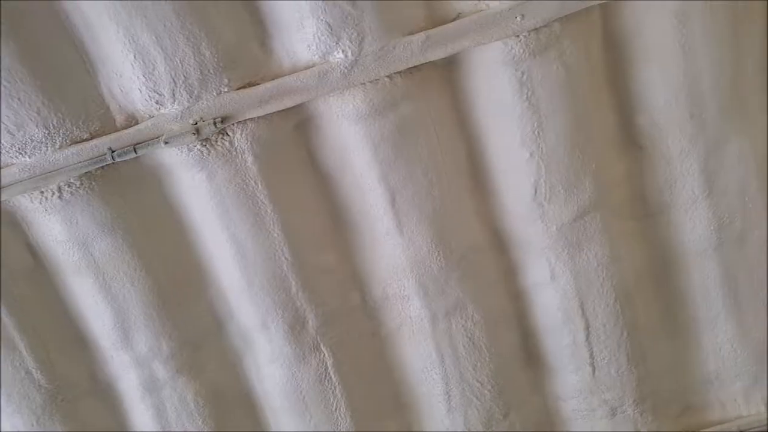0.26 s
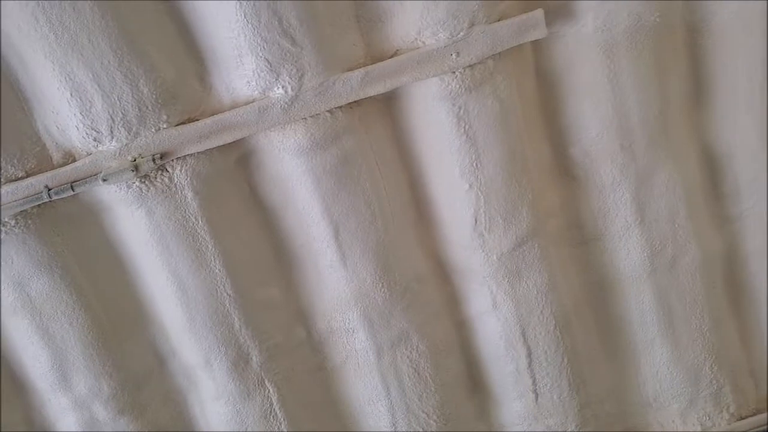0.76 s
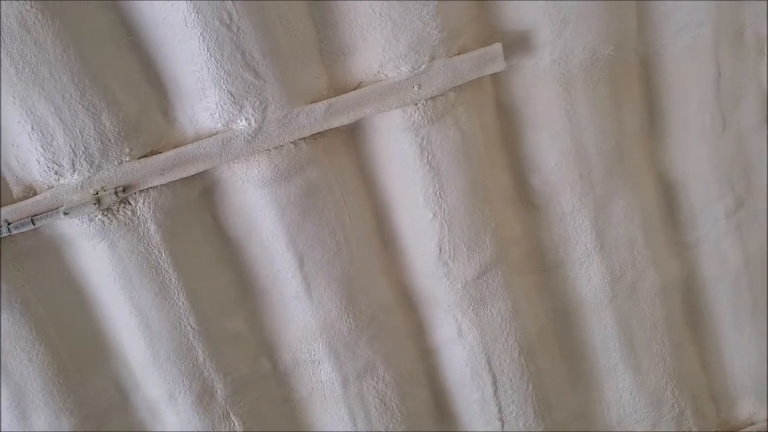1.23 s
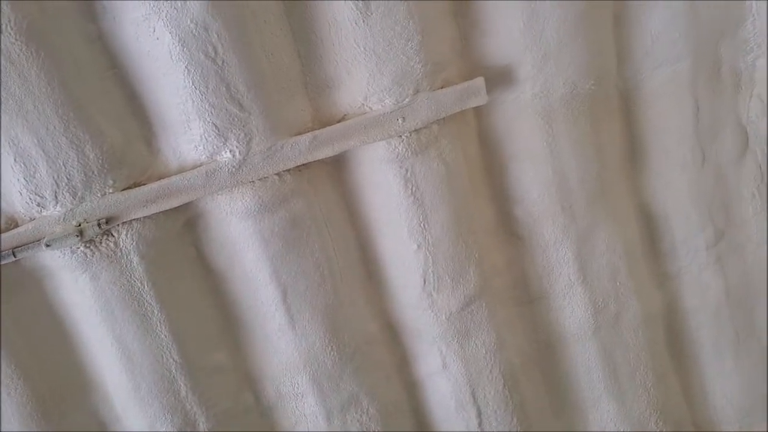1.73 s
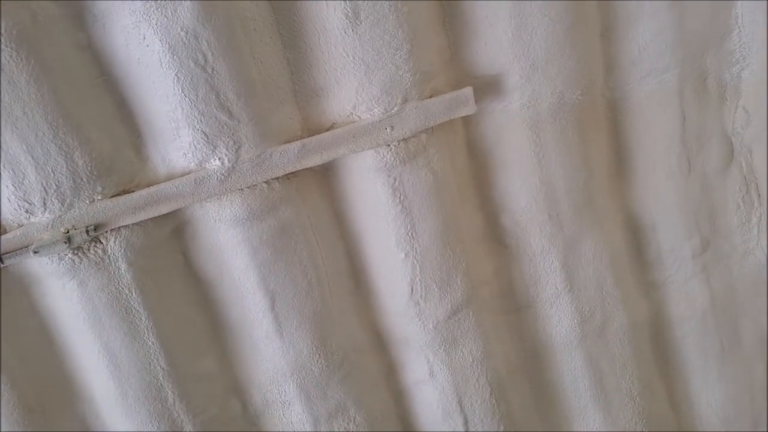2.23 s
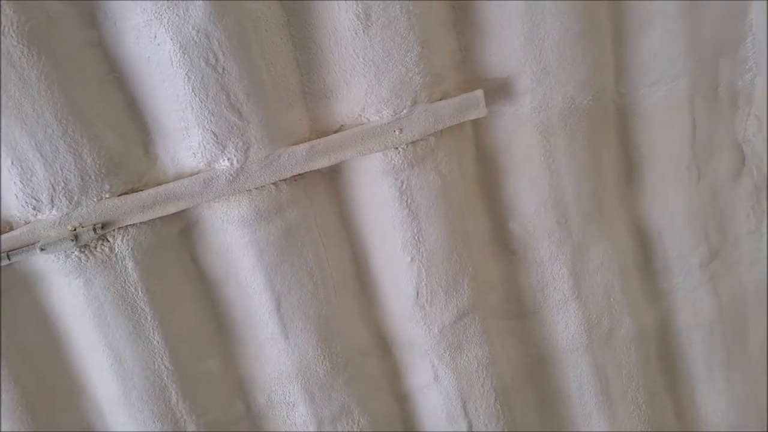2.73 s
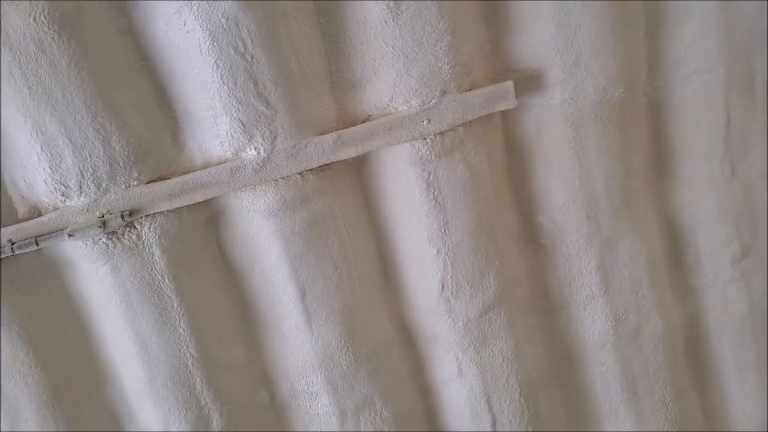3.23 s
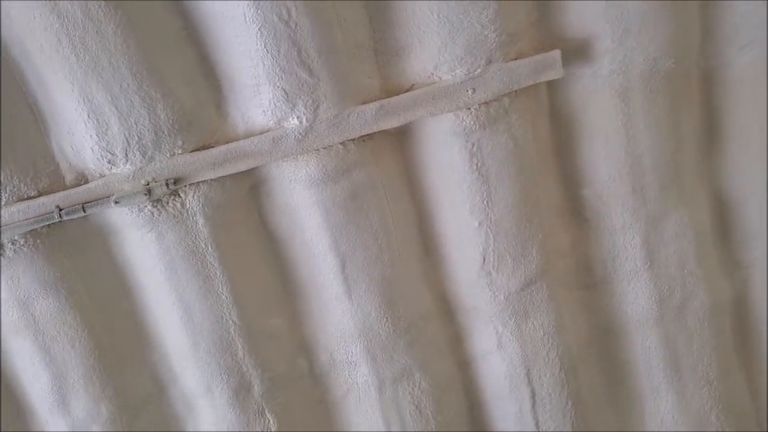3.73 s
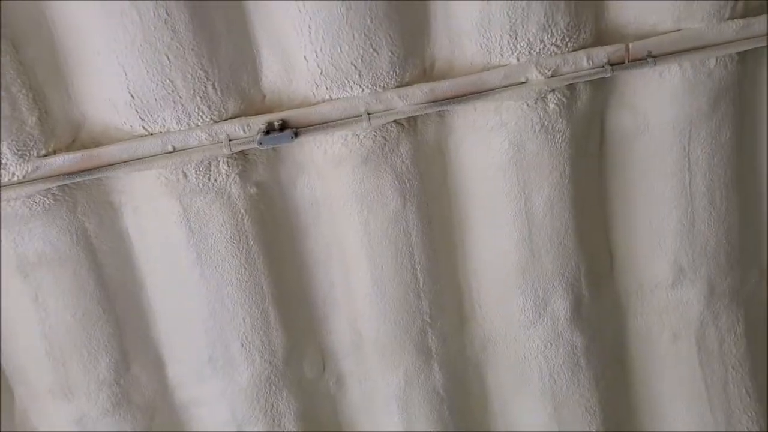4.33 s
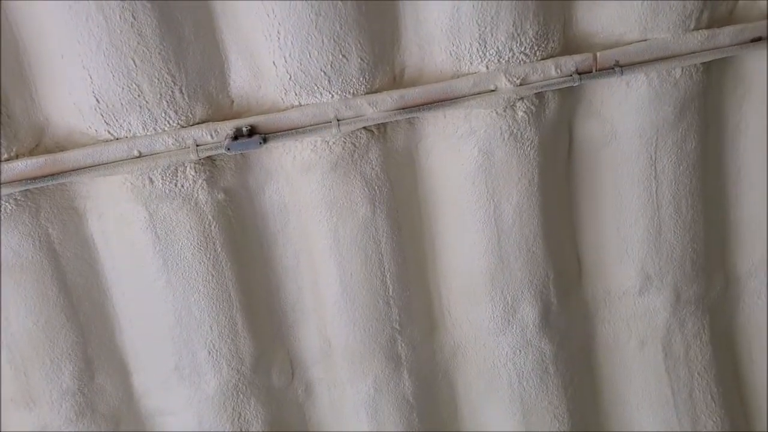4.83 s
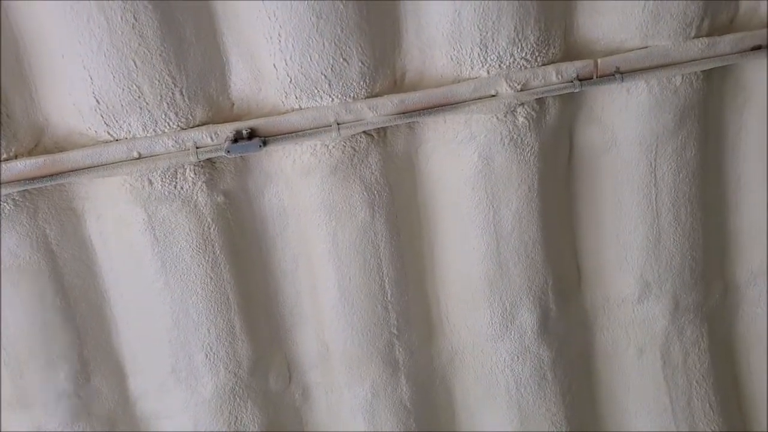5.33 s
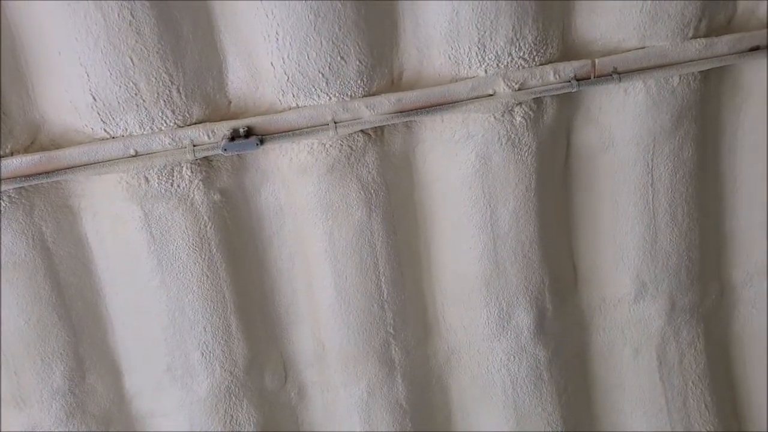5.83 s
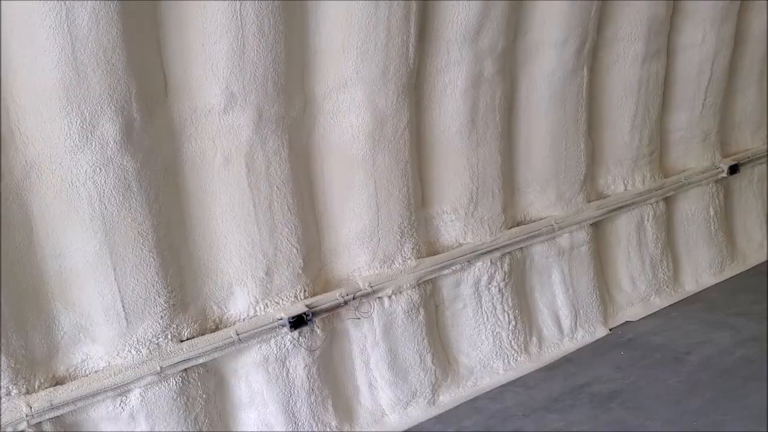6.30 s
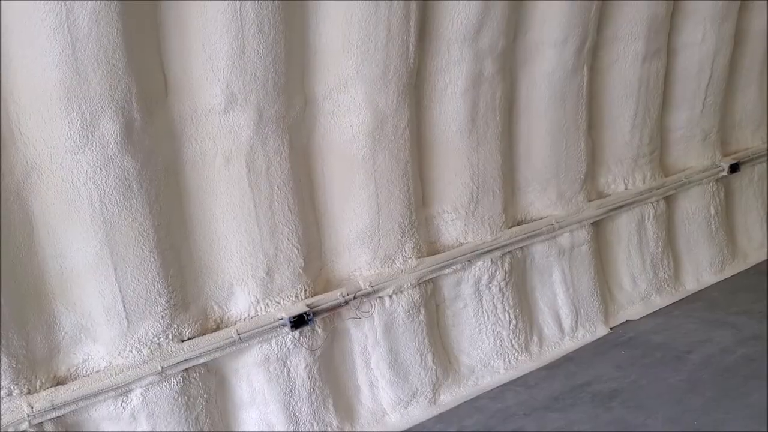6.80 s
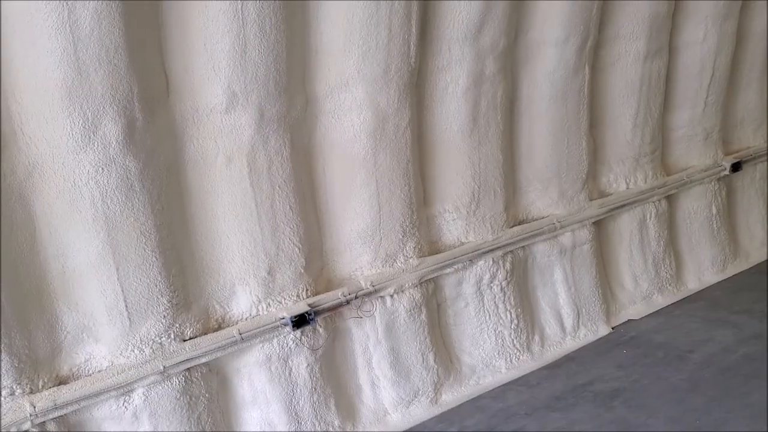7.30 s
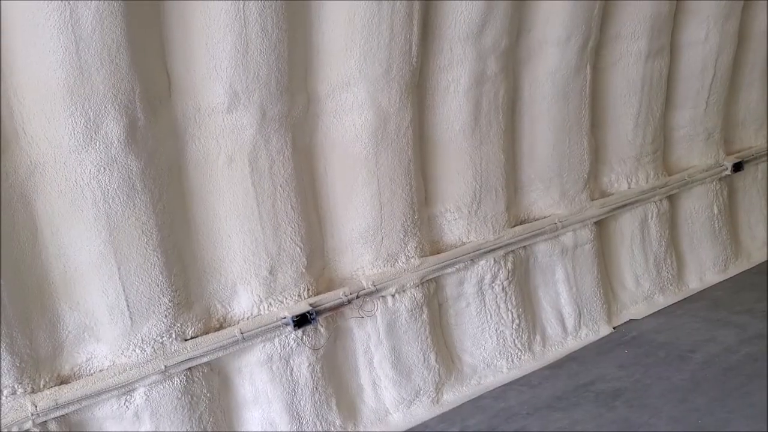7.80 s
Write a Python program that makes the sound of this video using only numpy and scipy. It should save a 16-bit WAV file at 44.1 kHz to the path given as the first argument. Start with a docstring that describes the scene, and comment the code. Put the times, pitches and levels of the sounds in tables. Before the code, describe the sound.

In a large, empty metal shed, stiff foam tears off the steel with six abrupt cracks: two moderate, then two louder and bassier, then two thinner and brighter after longer gaps. Each has a quick floor slap and a dense, fading echo. Underneath are soft hiss, a thin high insect buzz mostly on the left, and low thumps and rumble from a hand-held phone.

```python
"""Foam cracking off a steel roof

Hard foam lets go of a steel roof in a long vaulted shed: six sharp cracks of torn noise and clicks, each with
a floor bounce and dense reverberation made of decaying noise. Insects outside are a pulsed noise band.
The hand-held phone rumbles with filtered noise and takes bumps made of short tones. Under it all lie hiss
and faint low sines. The phone's two microphones differ in colour."""
import sys
import numpy as np
from scipy import signal
from scipy.fft import rfft, irfft, next_fast_len
from scipy.io import wavfile
from scipy.ndimage import uniform_filter1d, map_coordinates

SR = 44100
rng = np.random.default_rng(int(sys.argv[2]) if len(sys.argv) > 2 else 0)


def waveform_to_disk(signal):
    """Save audio, clipped to [-1, 1], as 16-bit WAV at the path in sys.argv[1]."""
    frames = np.transpose(np.atleast_2d(signal))
    scaled = np.clip(frames, -1, 1) * 32767
    samples = np.round(scaled).astype(np.int16)
    wavfile.write(sys.argv[1], SR, samples)


N = 355225


def amp(db):
    """Amplitude ratio of a level in dB."""
    return 10 ** (np.asarray(db) / 20)


def unit(x):
    """x scaled to unit RMS in each channel."""
    return x / np.sqrt(np.mean(x ** 2, axis=-1, keepdims=True) + 1e-20)


def along(points, hz):
    """(f/Hz, value) points interpolated on a log-frequency axis."""
    f, v = np.transpose(points)
    return np.interp(np.log(hz + 1), np.log(f + 1), v)


def bell(hz, centre_hz, width_hz, db):
    """A resonance peak or dip in dB; width at half its dB height."""
    return db / (1 + (2 * (hz - centre_hz) / width_hz) ** 2)


def curves(rows):
    """One value per sample for each column after the time."""
    s, *cols = np.transpose(rows)
    return np.array([np.interp(np.arange(N) / SR, s, c) for c in cols])


def wobble(knots_per_s):
    """A smooth random curve through normally distributed knots."""
    knots = rng.standard_normal(int(N * knots_per_s / SR) + 4)
    return map_coordinates(knots, [np.arange(N) * knots_per_s / SR])


def filtered(x, response):
    """x times a response of frequency."""
    n = x.shape[-1]
    m = next_fast_len(n + 8192)
    return irfft(rfft(x, m) * response(np.fft.rfftfreq(m, 1 / SR)), m)[..., :n]


def causal(gain_db):
    """The minimum-phase response with this gain, through the folded cepstrum."""
    c = irfft(gain_db * np.log(10) / 20)
    half = c.shape[-1] // 2
    c[..., 1:half] *= 2
    c[..., half + 1:] = 0
    return np.exp(rfft(c))


def cracks():
    """Foam tears off the sheet: direct sound and shed reverberation, both coloured by roof and microphones."""
    # cracks: t/s, strength/dB, bass/dB, treble/dB, snap/dB, bounce delay/ms, bounce/dB, lead-in/ms,
    # bass decay factor, knock of the sheet f/Hz, loosened panel f/Hz, panel/dB, boom/dB, rib mode/dB
    crack_rows = [(0.834, -29.5, -3, -3.5, -2.5, 6.4, -6.5, 1.9, 0.92, 1800, 1500, 1.5, 1.5, 2.5),
                  (1.725, -31, -2.5, -1.7, -1.5, 6.4, -1, 0.7, 0.95, 1750, 260, 3.5, -0.5, 6),
                  (1.965, -18.5, 8, -6, -1.5, 5.9, -0.5, 3.3, 1.195, 1411, 2500, 4, -3, 6),
                  (2.554, -13.5, 2, -8, -2.5, 4.9, -5.5, 0.98, 1.25, 442, 2454, 0.5, 1.5, -5.5),
                  (4.3507, -20, -14.5, 2, 1.5, 8.1, 0.5, 0.83, 0.98, 1660, 860, 10, 4.5, -10),
                  (6.7968, -23.5, -13, -2.05, 1.8, 6.6, 2, 0.72, 0.9, 1800, 750, 9.5, 3.5, -3.5)]
    n, start = 2 * SR, SR // 50
    t = (np.arange(n) - start) / SR
    out = np.zeros((2, N + n))
    for (s, strength_db, bass_db, treble_db, snap_db, delay_ms, bounce_db, lead_in_ms, bass_factor,
         knock_hz, panel_hz, panel_db, boom_db, rib_db) in crack_rows:
        burst, lead_in = tearing(t, start, lead_in_ms)
        bounce = floor_bounce(burst, delay_ms, bounce_db)
        near = direct_sound(amp(snap_db) * (burst + lead_in) + bounce, knock_hz)
        late = shed_filling(t, start, delay_ms, bass_factor)
        sound = roof_colour(amp(strength_db) * (near + late), bass_db, treble_db, knock_hz,
                            panel_hz, panel_db, boom_db, rib_db)
        out[:, round(s * SR) - start:][:, :n] += sound
    return out[:, :N]


def tearing(t, start, lead_in_ms):
    """The split: faint noise swelling just before the clicks, then clicks and a few ms of tearing noise."""
    tear = rng.standard_normal((2, len(t)))
    tear[1] = 0.47 * tear[0] + 0.19 * tear[1]
    burst = 0.75 * tear * (t > 0) * amp(-60 * np.maximum(t, 0) / 0.016)
    burst[:, start] = 0.59
    burst[:, start + 14] += 2.1  # the main click, 14 samples after the first
    burst[:, start + rng.integers(20, 90)] += 0.8  # a weaker third click at a random short delay
    lead_in = 0.17 * tear * (t < 0) * np.exp(np.minimum(t, 0) * 1000 / lead_in_ms)
    return burst, lead_in


def floor_bounce(burst, delay_ms, bounce_db):
    """The floor returns the burst after a delay, stronger on the right."""
    lag = round(delay_ms * SR / 1000)
    delayed = np.pad(burst, ((0, 0), (lag, 0)))[:, :burst.shape[1]]
    return delayed * amp(bounce_db + np.array([[-5], [1.5]]))


def sheet_knock(hz, knock_hz, db):
    """Resonance of the sheet under the crack."""
    return bell(hz, knock_hz, knock_hz / 3.6, db)


def direct_sound(x, knock_hz):
    """Snap and bounce with a strong knock; the left microphone faces the roof and gets more treble."""
    # direct sound over the reverberation: f/Hz, left/dB, right/dB
    facing = [(150, -1.5, -1), (400, 3, 0.5), (1500, 4.5, 5.5), (3020, 11, 9.5), (5370, 17, 7),
              (10000, 17, 6.5)]
    facing_hz, *facing_db = np.transpose(facing)

    def response(hz):
        sides_db = np.array([along(list(zip(facing_hz, db)), hz) for db in facing_db])
        return causal(sheet_knock(hz, knock_hz, 15) + sides_db)

    return filtered(x, response)


def shed_filling(t, start, delay_ms, bass_factor):
    """Reverberation swells as the shed fills."""
    after = np.maximum(t, 0)
    fill_s = 0.00042 * delay_ms ** 2  # the nearer the crack, the later its floor bounce and the far walls
    late = np.pad(reverberation(bass_factor, len(t)), ((0, 0), (start, 0)))[:, :len(t)]
    slow_rise = 0.46 + 0.49 * (1 - np.exp(-(after / fill_s) ** 2))
    onset = 1 - np.exp(-after / 0.0012)
    return late * slow_rise * onset


def reverberation(bass_factor, n):
    """Diffuse stereo noise: sound keeps arriving along the vault, then each band dies at its own speed."""
    # shed decay before the bass factor: f/Hz, t60/s
    shed = [(60, 1.2), (160, 1), (420, 0.82), (900, 0.78), (1500, 0.48), (3000, 0.64), (6000, 0.6),
            (10000, 0.46), (15000, 0.52)]
    # how long sound keeps arriving along the vault: f/Hz, hold/s
    vault_hold = [(70, 0.1), (200, .12), (1000, 0.13), (3000, 0.097), (10000, 0.092)]
    # left-right likeness of the field: f/Hz, correlation
    diffuse = [(60, 0.83), (130, 0.97), (250, 1), (500, 0.65), (900, -0.003), (1400, -.1), (3000, .02)]
    hz, t, z = signal.stft(rng.standard_normal((2, n)), SR, nperseg=512, noverlap=384)
    t60_s = along(shed, hz) * along([(500, bass_factor), (1100, 1)], hz)
    hold_s, knee = along(vault_hold, hz)[:, None], 2.5
    decay_s = (t ** knee + hold_s ** knee) ** (1 / knee) - hold_s
    z = z * amp(-60 * decay_s / t60_s[:, None])
    z = z * (1 - np.exp(-(t + 0.002) * (hz[:, None] + 1) / 1.4))  # the bass needs a few cycles to build up
    # random patches of louder and softer reverberation across time and frequency
    patches = uniform_filter1d(rng.standard_normal(z.shape[1:]), size=5, axis=0)
    patches = uniform_filter1d(patches, size=9, axis=1)
    z = z * amp(1.5 * patches / patches.std())
    turn = np.arccos(np.clip(along(diffuse, hz), -1, 1))[:, None] / 2
    mid, side = z[0] * np.cos(turn), z[1] * np.sin(turn)
    pair = np.array([mid + side, mid - side])
    return signal.istft(pair, SR, nperseg=512, noverlap=384)[1][:, :n]


def roof_colour(x, bass_db, treble_db, knock_hz, panel_hz, panel_db, boom_db, rib_db):
    """Sheet resonances, spectral slope and microphone colour as one minimum-phase filter."""
    # panel resonances and the dips between them: f/Hz, width/Hz, level/dB
    roof_modes = [(103, 8.4, 2), (165, 12, 6), (251.2, 18, 6), (329.3, 19, 1.5), (398, 15, 4.5),
                  (463, 7.4, 6.5), (597.2, 110, -0.5), (1105.4, 100, 3), (1480, 75, 2), (1988, 120, 0.5),
                  (2340, 120, 1.5)]
    # crack colour of the left microphone: f/Hz, level/dB
    left_colour = [(60, -12.5), (150, -17), (420, -0.2), (750, -5.5), (1300, -2.35), (2000, -3),
                   (3000, -0.5), (4000, 0.5), (5600, 3), (6500, -4), (7300, -21), (8800, -8.5),
                   (11000, -20.5), (15500, -41.5)]
    # crack colour of the right microphone: f/Hz, level/dB
    right_colour = [(60, -8), (150, -17), (420, -2.5), (750, -8), (1300, -2.3), (1700, -0.5), (2100, -6),
                    (2900, 0.37), (3800, -7.5), (6000, -10), (7500, -17), (11000, -26), (13500, -29),
                    (15500, -49.5)]

    def response(hz):
        tone_db = along([(200, bass_db), (1805, 0), (11060, treble_db)], hz)
        tone_db = tone_db + bell(hz, panel_hz, panel_hz / 2.7, panel_db)
        tone_db += bell(hz, 1170, 420, rib_db)
        tone_db += sheet_knock(hz, knock_hz, 3)  # stands out less here than in the direct sound
        tone_db += bell(hz, 450, 220, boom_db)  # low ring of the sheet
        roof_db = sum(bell(hz, *mode) for mode in roof_modes)
        rumble_cut_db = along([(20, -33), (55, 0.0)], hz)
        sides_db = np.array([along(left_colour, hz), along(right_colour, hz)])
        return causal(tone_db + roof_db + rumble_cut_db + sides_db)

    return filtered(x, response)


def grip_tremor():
    """The hand's tremor shakes the case: noise through a resonance around 62 Hz."""
    # tremor before the left cut: t/s, left/dB, right/dB
    tremor_level = [(0, -75), (.17, -73), (.25, -67.5), (.6, -68.5), (1.1, -70.5), (1.6, -71.5),
                    (3.5, -77.5), (4, -65), (4.3, -76), (4.9, -68.5), (5.5, -72), (6.7, -72), (7.6, -71.5),
                    (8.05, -75)]
    case_hz, case_width_hz = 62, 35
    left_cut_db = -8.5  # the left microphone is further from the hand
    shake = rng.standard_normal((2, N))
    shake[0] += 0.5 * shake[1]

    def response(hz):
        case = 1j * hz * case_width_hz / (case_hz ** 2 - hz ** 2 + 1j * hz * case_width_hz)
        low_pass = 1 / (1 + (hz / 160) ** 2)
        high_pass = hz ** 2 / (hz ** 2 + 35 ** 2)
        return case * low_pass * high_pass

    tremor = unit(filtered(shake * amp(0.84 * wobble(19)), response))
    return tremor * amp(curves(tremor_level) + np.array([[left_cut_db], [0]]))


def finger_bumps():
    """Each finger bump on the case is a damped 66 Hz thud with a brief 600 Hz tick."""
    # bumps, gain on the thud: t/s, left/dB, right/dB
    bump_rows = [(0.183, -62, -39), (.636, -70, -49.5), (0.668, -76, -53), (6.119, -78.5, -66)]
    t = np.arange(SR // 5) / SR
    thud = 0.76 * np.sin(2 * np.pi * 66 * t) * amp(-60 * (t / 0.069) ** 2)
    thud -= 0.17 * np.sin(2 * np.pi * 600 * t) * amp(-60 * t / 0.0033)  # the tick of the skin
    out = np.zeros((2, N))
    for s, *side_db in bump_rows:
        i = round(s * SR)
        out[:, i:i + len(t)] += amp(side_db)[:, None] * thud
    return out


def insects():
    """A far chorus: narrow-band noise, partly pulsed by the wing beat, mostly in the left microphone."""
    # insect band shape, relative: f/Hz, level/dB
    buzz_band = [(4300, -43.5), (4800, -14), (5200, -3), (5500, 1), (5800, -6.5), (6200, -14), (7000, -37)]
    # chorus on the left before flutter: t/s, level/dB
    chorus_level = [(0, -64.5), (.8, -61), (3.5, -62.5), (4.2, -65), (5.5, -66.5), (6.7, -64), (8.05, -64)]
    right_cut_db = -16
    beat_cycles = np.cumsum(73 + 0.6 * wobble(2)) / SR  # around 73 Hz
    depth = np.clip(0.22 + 0.14 * wobble(2.6), 0, 1)
    pulse = 1 + depth * np.cos(2 * np.pi * beat_cycles)
    pulse += 0.5 * depth * np.cos(4 * np.pi * beat_cycles)
    pulsed = rng.standard_normal((2, N)) * pulse
    band = unit(filtered(pulsed, lambda hz: amp(along(buzz_band, hz)) * (hz > 3500) * (hz < 7500)))
    flutter_db = 0.65 * wobble(8.7)
    return band * amp(curves(chorus_level) + flutter_db + np.array([[0], [right_cut_db]]))


def low_tones():
    """Faint sines that fade in and out while their level wavers."""
    # low tones, mean peak level: from t/s, to t/s, f/Hz, level/dB
    tone_rows = [(3.85, 4.35, 156, -81.5), (2.7, 6.1, 237, -87)]
    t = np.arange(N) / SR
    out = np.zeros(N)
    for start_s, end_s, hz, db in tone_rows:
        fade = np.clip(np.minimum(t - start_s, end_s - t) / 0.073, 0, 1)
        out += fade * amp(db + 1.91 * wobble(8)) * np.sin(2 * np.pi * hz * t)
    return out


def room_tone():
    """Steady hiss of air and microphones: white noise shaped per channel."""
    # left hiss density: f/Hz, level/(dB per Hz)
    left_hiss = [(40, -115), (150, -108), (300, -111), (700, -118), (1200, -115), (2500, -116.5),
                 (4300, -117), (6800, -112), (7400, -119), (8600, -112), (10500, -124), (15500, -127)]
    # right hiss density: f/Hz, level/(dB per Hz)
    right_hiss = [(40, -115), (150, -106), (300, -110), (700, -116), (1100, -112), (1600, -116),
                  (3000, -116.5), (4300, -121), (7300, -128), (9500, -129), (11500, -123.5), (15500, -127)]
    white = rng.standard_normal((2, N)) * np.sqrt(SR / 2)  # unit power per Hz
    return filtered(white, lambda hz: amp([along(left_hiss, hz), along(right_hiss, hz)]))


def scene():
    """All sources, summed in stereo."""
    return cracks() + grip_tremor() + finger_bumps() + insects() + low_tones() + room_tone()


def record(dry):
    """The phone keeps nothing above its band limit."""
    band_limit_hz = 15800
    return filtered(dry, lambda hz: hz < band_limit_hz)


dry = scene()
out = record(dry)
waveform_to_disk(out)
```